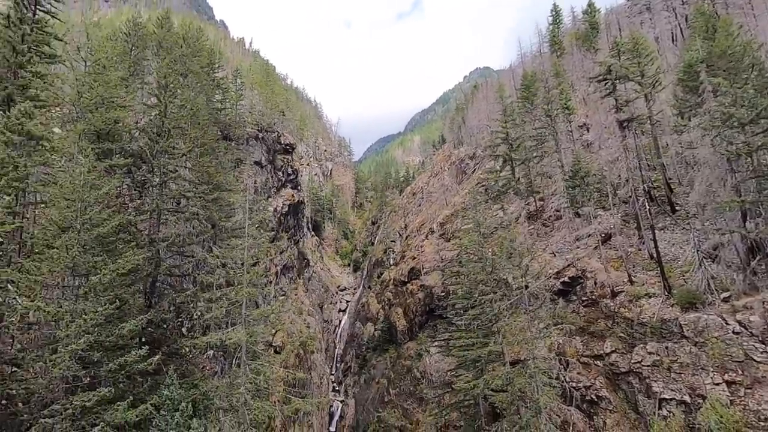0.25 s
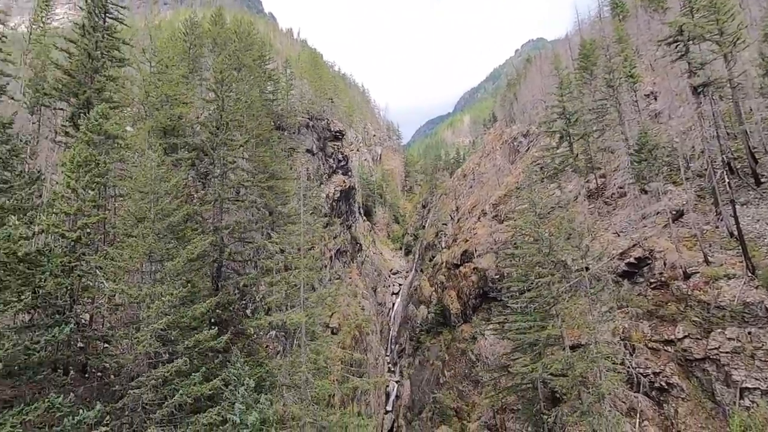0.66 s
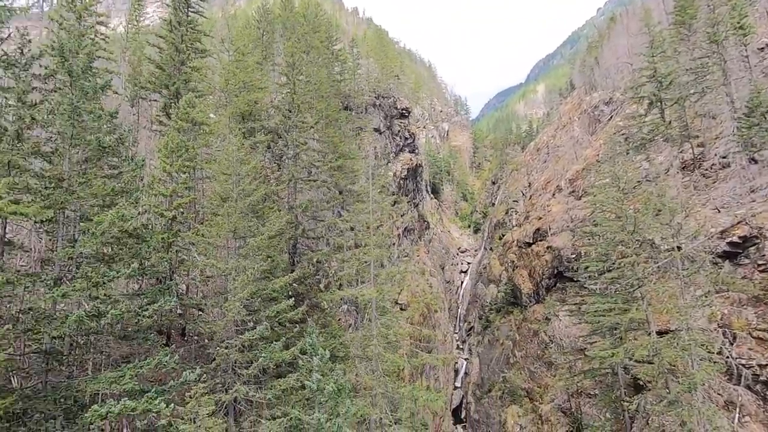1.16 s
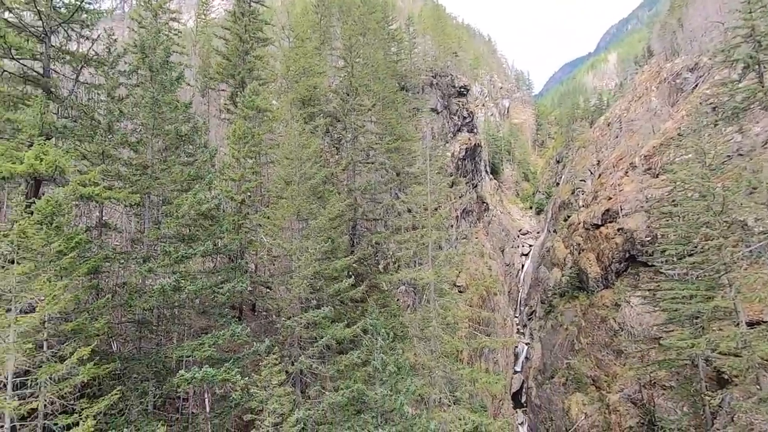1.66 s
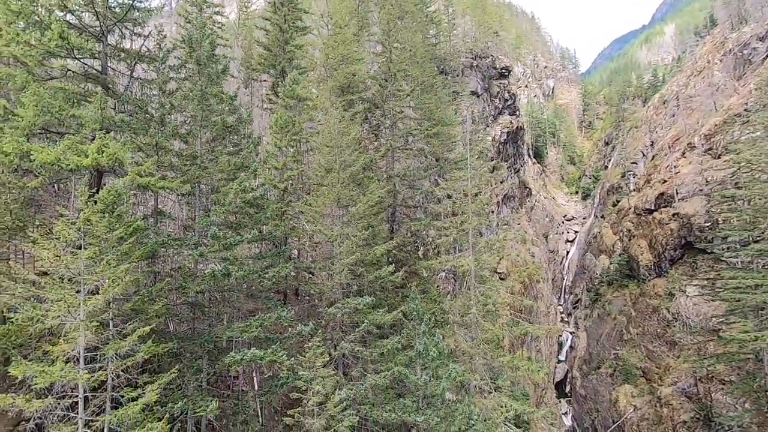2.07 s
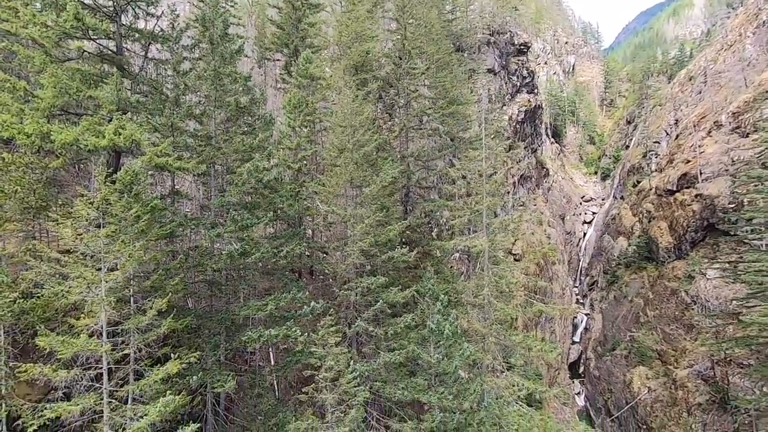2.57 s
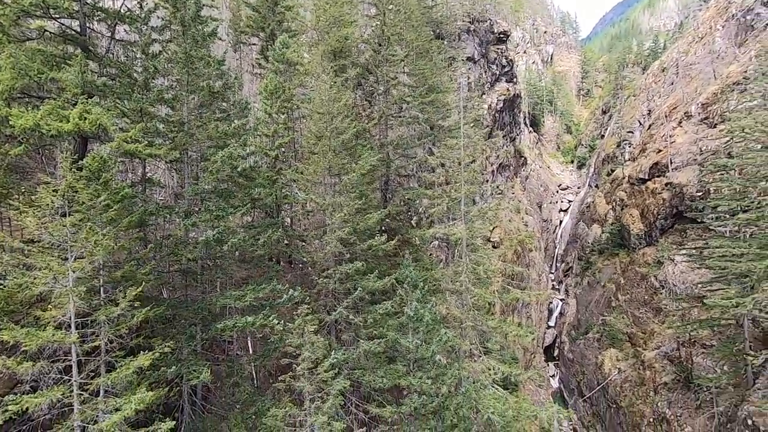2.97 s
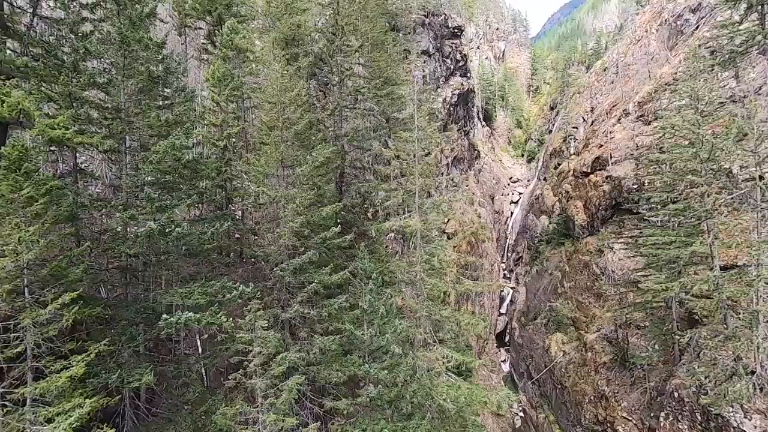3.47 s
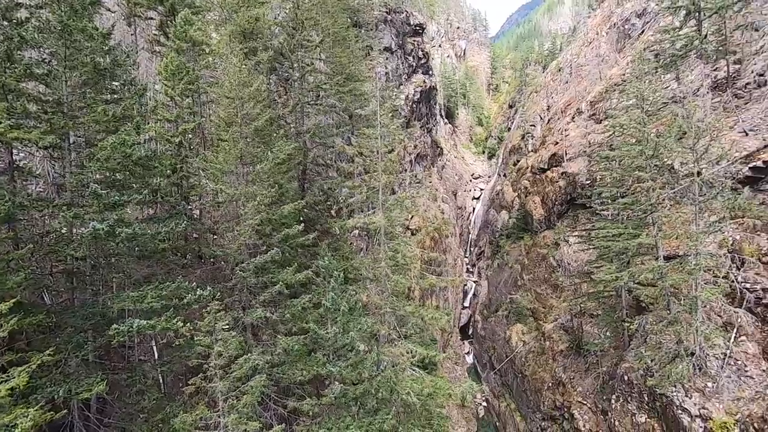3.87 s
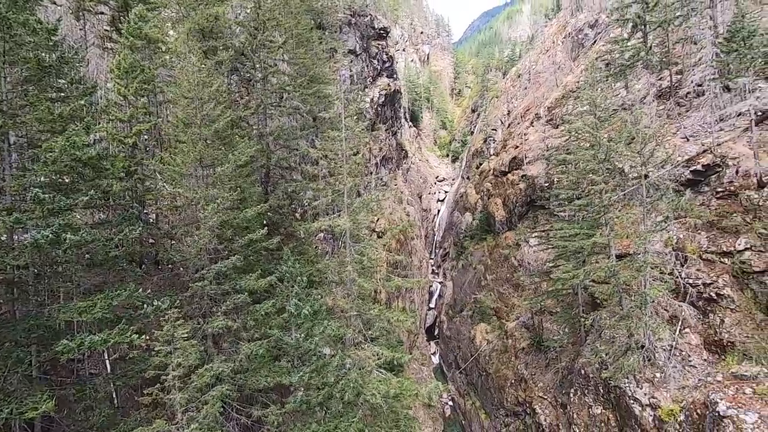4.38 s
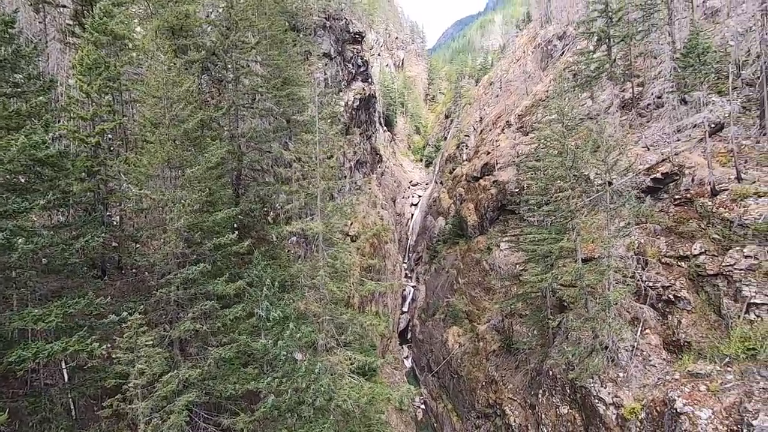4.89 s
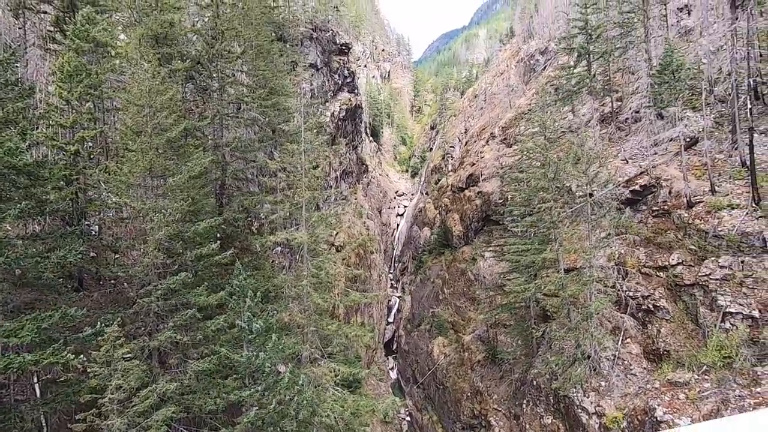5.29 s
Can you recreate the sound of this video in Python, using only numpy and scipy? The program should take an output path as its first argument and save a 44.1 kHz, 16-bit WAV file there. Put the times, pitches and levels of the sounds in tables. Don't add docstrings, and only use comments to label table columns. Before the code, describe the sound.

For about five and a half seconds, a distant waterfall in a rocky, wooded gorge gives a continuous smooth rush, strongest in the low mids and fading gently toward the top, with no individual drips or splashes. It starts slightly brighter, dips near 0.4 s, then wavers by only a decibel or two, a touch fuller from 3 to 5 s. Against the bare microphone, wind makes very deep pressure heaves, felt more than heard, with soft thumps, flutter and low rumble. Small puffs come at 0-0.3 s and 0.5-0.8 s, a calmer spell follows around 1-1.4 s, and a low bump lands near 1.7 s. More buffets come at 2.1 and 2.6 s. Stronger gusts crowd in from 3.1 to 3.7 s, with the biggest heave near 3.7-3.9 s and another strong gust at 4.25 s. Moderate rumbling continues, easing toward the end. Single-channel, outdoors, no distinct echo.

```python
import sys
import numpy as np
from scipy import signal
from scipy.fft import rfft, irfft
from scipy.io import wavfile
from scipy.ndimage import uniform_filter1d

SR = 44100
rng = np.random.default_rng(int(sys.argv[2]) if len(sys.argv) > 2 else 0)


def volts_from_db(level):
    exponent = np.asarray(level, float) / 20
    return 10 ** exponent


def wav_record(signal):
    frames = np.transpose(np.atleast_2d(signal))
    bounded = np.clip(frames, -1, 1)
    quanta = np.round(bounded * 32767).astype(np.int16)
    wavfile.write(sys.argv[1], SR, quanta)


N = 244314


def evened(x):
    return x / np.sqrt(np.mean(x ** 2) + 1e-30)


def read(points, hz):
    point_hz, value = np.transpose(points)
    return np.interp(np.log(hz + 0.1), np.log(point_hz + 0.1), value)


def water_drift(t, hz):
    # (time [s], loudness [dB], brightness from roar to spray [dB], mid fullness [dB])
    fall_drift = [(0.0, 1, 2.5, -0.2), (.2, 0.5, 1.2, -0.5), (.42, -0.65, -1, -0.8), (.75, -0.2, 0.5, 0.2),
                  (1.05, -0.2, 0.5, 0.5), (1.25, 0.4, 0, 0), (1.45, 0.45, 0, 0.1), (1.85, 0.7, 0.1, -1.1),
                  (2.1, 0.76, 0.5, 0.3), (2.5, 0, -0.7, 0.3), (2.9, 0.5, -0.3, 0), (3.3, 1, -0.1, 1.5),
                  (3.85, 1.1, -1, -0.3), (4.15, 1, -0.8, -0.9), (4.35, 1.2, 0.5, 0), (4.65, 0.95, 0.5, 1.4),
                  (5.05, 1, -0.4, 0), (5.5, -0.5, 0.4, 0)]
    fall_span_hz = [550, 2300, 9800]
    # (time [s], plunge pool boom [dB], haze over the finest spray [dB])
    gorge_drift = [(0.1, 3.5, 2.5), (.3, -0.9, 1.5), (.5, -1.5, 0), (.9, 3.5, 1), (1.1, 2, -1),
                   (1.4, -0.5, 1.5), (1.7, -0.7, 0.2), (1.9, 0, -.1), (2.1, 0.5, 0.5), (2.4, -0.5, -1),
                   (2.8, -0.3, 0), (3.1, 1, -0.7), (3.7, 1, -1.5), (4.1, -3, 0.5), (4.5, 4.5, 0),
                   (4.85, 0, -1), (5.1, 0, -0.5), (5.4, 1, -0.5)]

    tilt = read(list(zip(fall_span_hz, (-1, 0, 1))), hz)[:, None]
    hump = read(list(zip(fall_span_hz, (-1, 1, -1))), hz)[:, None]
    s, loud_db, bright_db, full_db = np.transpose(fall_drift)
    drift_db = np.interp(t, s, loud_db - loud_db.mean())
    drift_db = drift_db + tilt * np.interp(t, s, bright_db) + hump * np.interp(t, s, full_db)

    boom = read([(420, 1), (620, 0)], hz)[:, None]
    haze = read([(6500, 0), (9500, -1)], hz)[:, None]
    s, boom_db, haze_db = np.transpose(gorge_drift)
    return drift_db + boom * np.interp(t, s, boom_db) + haze * np.interp(t, s, haze_db)


def waterfall():
    # (frequency [Hz], density [dB per Hz])
    water = [(60, -85), (110, -89), (150, -78), (220, -77.5), (500, -76), (800, -77), (2200, -82.5),
             (3600, -86.5), (5500, -90), (7000, -92.5), (8300, -98.5), (9700, -103), (10700, -107.5),
             (13000, -113.1), (15500, -117.0)]
    water_db, patchy_db, flicker_db = -44.2, 0.7, 0.05
    steady = 0.41
    size, hop = 1024, 256

    frames = N // hop + 5
    hz = np.fft.rfftfreq(size, 1 / SR)
    t = np.arange(frames) * hop / SR
    a, b, patches = rng.standard_normal((frames, len(hz), 3)).T
    patches = uniform_filter1d(patches, size=10, axis=0)
    patches = evened(uniform_filter1d(patches, size=12, axis=1))
    flicker = evened(uniform_filter1d(rng.standard_normal(frames), size=6))

    blend = uniform_filter1d(a ** 2 + b ** 2, size=9, axis=0)
    blend = uniform_filter1d(blend, size=36, axis=1)
    smooth = (a + 1j * b) / blend ** (steady / 2)

    field_db = read(water, hz)[:, None] + water_drift(t, hz)
    field_db = field_db + patchy_db * patches + flicker_db * flicker
    wash = signal.istft(smooth * volts_from_db(field_db), nperseg=size, noverlap=size - hop)[1][:N]
    return volts_from_db(water_db) * evened(wash)


def eddies(lo_hz, hi_hz, steady, span):
    # (frequency [Hz], density [dB per Hz])
    turbulence = [(.7, -6), (3.4, -7), (7, 1), (11, -15.5), (17, -25.5), (27, -28.5), (44, -44.5),
                  (55, -42), (72, -50), (115, -40.5), (160, -51.5), (260, -55)]

    hz = np.fft.rfftfreq(N, 1 / SR)
    band = 1 / np.sqrt((1 + (lo_hz / (hz + 0.1)) ** 12) * (1 + (hz / hi_hz) ** 12))
    spectrum = rfft(rng.standard_normal(N)) * volts_from_db(read(turbulence, hz)) * band
    swirl = evened(irfft(spectrum, N))
    power = abs(signal.hilbert(swirl)) ** 2 / 2
    local = uniform_filter1d(uniform_filter1d(power, size=span), size=span)
    return swirl / (local + 0.051) ** (steady / 2)


def surges(s, length, rise_db, calm_db, share):
    # (time [s], level over calm [dB])
    breeze_points = [(0, 2), (.3, -7), (.45, 8.5), (.75, -13), (1.05, 4), (1.6, -1), (1.8, -32), (2.1, 20),
                     (2.35, -17), (2.6, 11), (2.8, 12), (3.35, 18), (3.55, 12.5), (3.85, 10), (4.05, 8.5),
                     (4.5, 7), (5.15, 9), (5.54, 12.5)]

    t = np.arange(0, N + 256, 256) / SR
    bells = np.exp(-(2 * (t[:, None] - s) / np.maximum(length, 0.03)) ** 2)
    breeze = volts_from_db(share * np.interp(t, *np.transpose(breeze_points)))
    surge_power = np.sum((volts_from_db(rise_db) * bells) ** 2, axis=1)
    gain = volts_from_db(calm_db) * np.sqrt(breeze ** 2 + surge_power)
    return np.interp(np.arange(N) / SR, t, gain)


def wind():
    # (time [s], rise over calm [dB])
    heaves = [(0.04, 12), (.29, 12), (.46, 5), (.57, 13.5), (.67, 11.5), (.81, 6.5), (.97, 6), (1.08, 6),
              (1.25, 3), (1.42, 8), (1.53, 11), (1.62, -0.5), (1.72, 6.5), (1.89, 6.5), (2.06, 2),
              (2.16, 12), (2.31, 8), (2.47, 0.5), (2.58, 6), (2.8, 12.5), (2.97, 6), (3.06, 14),
              (3.15, 10.5), (3.26, 10), (3.42, 12.5), (3.58, 12), (3.71, 21.5), (3.87, 19), (4.07, 11),
              (4.22, 11), (4.31, 14.5), (4.4, 8), (4.65, 11), (4.75, 12), (4.95, 10), (5.07, 9), (5.22, 10),
              (5.38, 8.5)]
    # (time [s], length [s], rise over calm [dB],
    # fineness per step to smaller eddies [dB], extra flutter [dB])
    gusts = [(0.02, .1, 15, -2, 5), (0.1, 0.18, 14, -2, 1), (0.163, .08, 6, -6, -5),
             (0.247, 0.19, 5, 0.5, 2.5), (.54, .07, 9, -8, -3), (0.582, 0.079, 13, -2.5, 2),
             (0.74, 0.11, 4, 3, 7), (0.795, 0.098, 20.5, -4, -11), (0.94, 0.057, 13.5, -3, -9),
             (1.187, 0.075, 0.5, 5.5, -4), (1.27, .1, 0, -9, 0), (1.44, 0.088, -1, -6, -2),
             (1.508, 0.2, 7, 3, -4), (1.603, 0.092, 9, -11, -2), (1.722, 0.086, 20.5, -14, 6),
             (1.842, 0.076, 3, -2, 7), (1.92, 0.16, 8.5, -3, 6), (2.023, .07, 1, -3, 5),
             (2.1, 0.14, 14.5, -7.5, 0), (2.235, 0.15, 11.5, -5, -2), (2.44, 0.086, 3, 5, -4),
             (2.523, 0.11, 8, -18, -5), (2.643, 0.28, 16, -17, -2), (2.815, 0.26, 8.5, -1.5, 10),
             (2.932, 0.052, 6, 2, 3), (3.067, 0.12, 10.5, 0.5, 6), (3.27, 0.11, 22, -2.5, -2),
             (3.154, 0.073, 18, -8, -1), (3.394, 0.18, 11, 1.5, 7), (3.616, 0.075, 16, 0.5, -8),
             (3.687, 0.19, 19, -3, -1), (3.85, 0.06, -3.5, 5.5, 1.5), (4.25, 0.13, 21.5, -4.5, -3),
             (4.436, 0.21, 13, -4.5, -7), (4.67, 0.11, 15, -13, -4), (4.778, 0.14, 16, -0.3, -11),
             (4.955, 0.3, 11.5, -1, -4), (5.22, 0.18, 13, -5, 3), (5.127, 0.062, 12, -5, 2),
             (5.357, 0.42, -0.5, 6, -4)]
    calm_eddy_db = [-50.5, -66.5, -64.5]
    breeze_shares = [0.33, 0.11, 0.92, 0.14]
    eddy_edges_hz = [0, 18, 42, 85, 400]
    eddy_steady = [0.84, 0.68, 1, 0.87]
    eddy_spans = [3000, 1500, 1500, 2000]
    heave_s, calm_heave_db = 0.13, -32
    middle_lift_db = 3.5

    s, rise_db = np.transpose(heaves)
    gains = [surges(s, heave_s, rise_db, calm_heave_db, breeze_shares[0])]
    s, length, rise_db, fine_db, flutter_db = np.transpose(gusts)
    for step, calm_db in enumerate(calm_eddy_db):
        size_rise_db = rise_db + step * fine_db
        if step == 1:
            size_rise_db = size_rise_db + middle_lift_db + flutter_db
        gains.append(surges(s, length, size_rise_db, calm_db, breeze_shares[step + 1]))

    push = np.zeros(N)
    for gain, lo_hz, hi_hz, steady, span in zip(gains, eddy_edges_hz, eddy_edges_hz[1:],
                                                eddy_steady, eddy_spans):
        push += gain * eddies(lo_hz, hi_hz, steady, span)
    settle = np.minimum(np.arange(N)[::-1] / (0.02 * SR), 1)
    return push * settle * (0.3 + 0.7 * signal.windows.tukey(N, 0.015))


def scene():
    return (waterfall() + wind())[None]


def low_pass(x):
    return signal.sosfilt(signal.butter(12, 15740, fs=SR, output="sos"), x)


def record(dry):
    return low_pass(dry)


dry = scene()
out = record(dry)
wav_record(out)
```